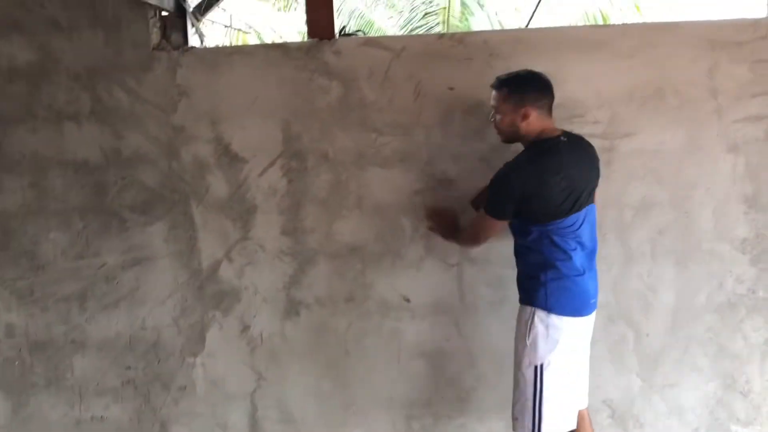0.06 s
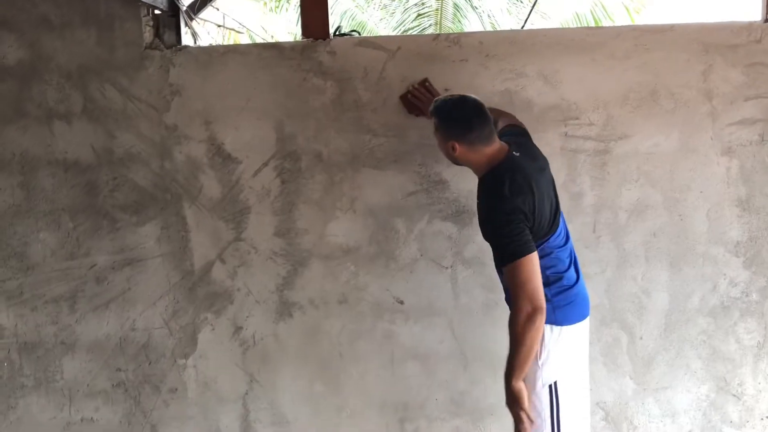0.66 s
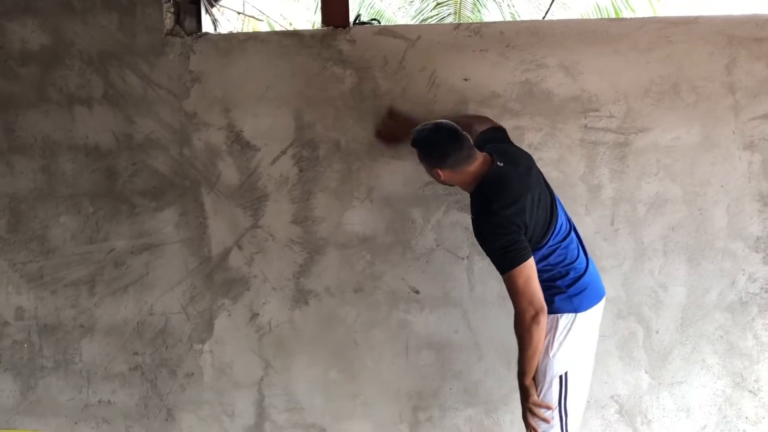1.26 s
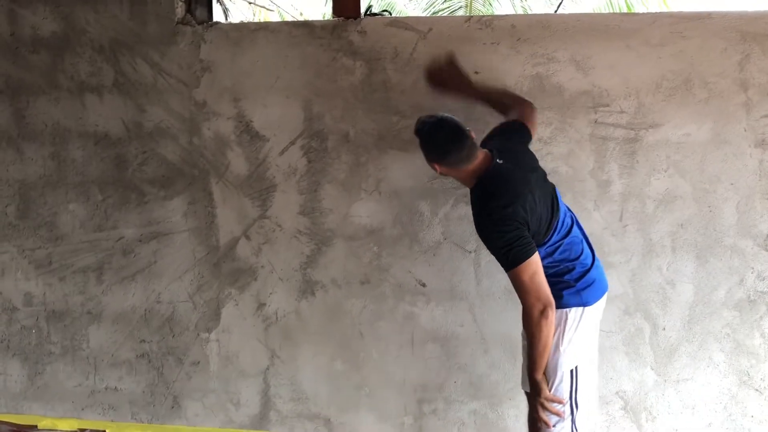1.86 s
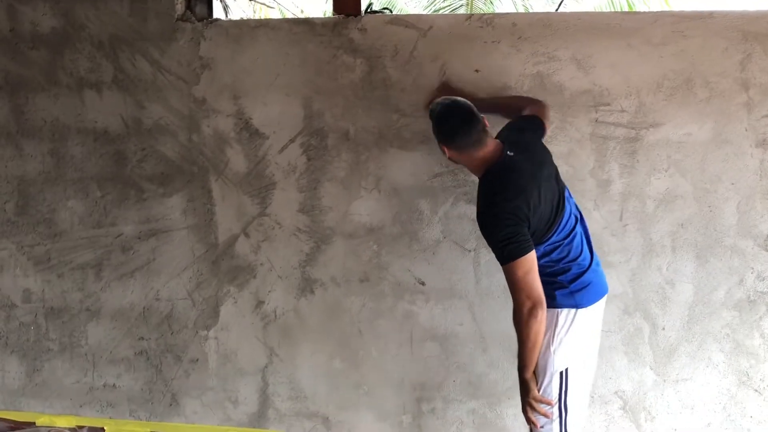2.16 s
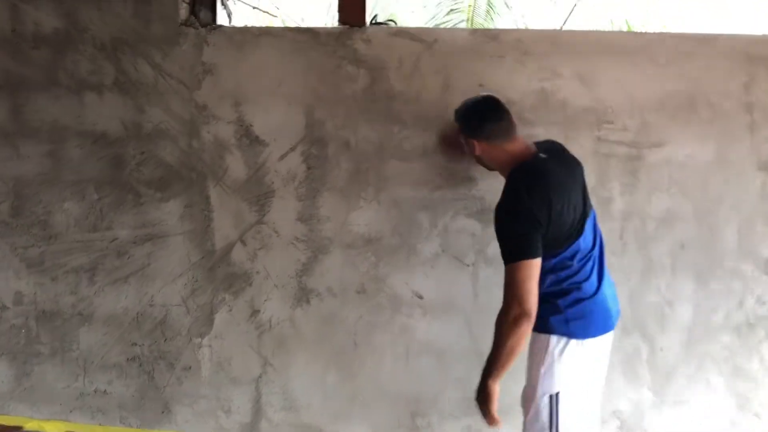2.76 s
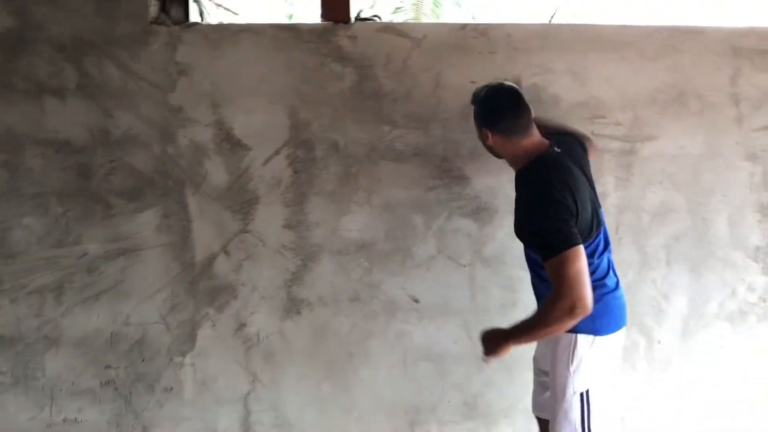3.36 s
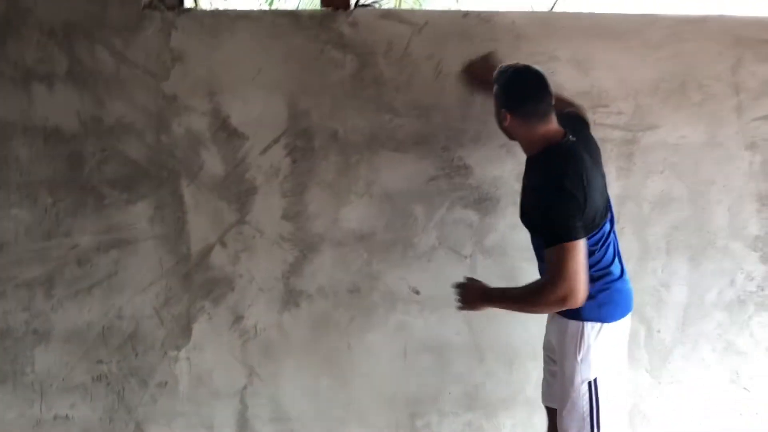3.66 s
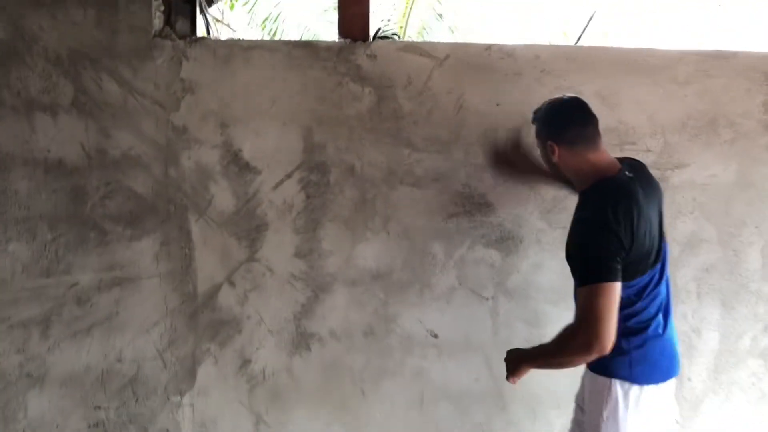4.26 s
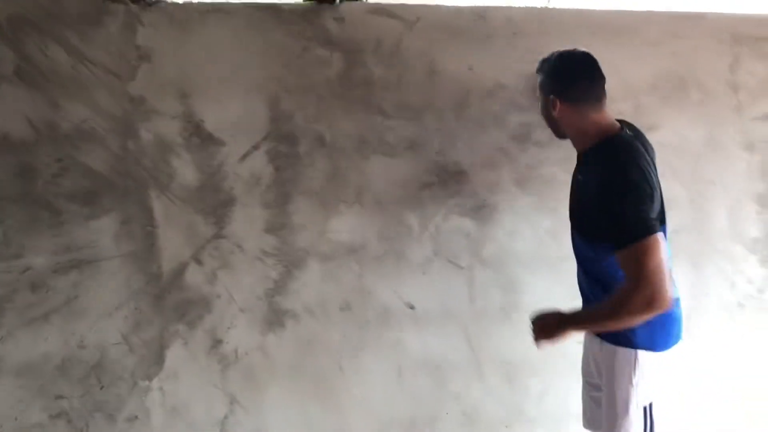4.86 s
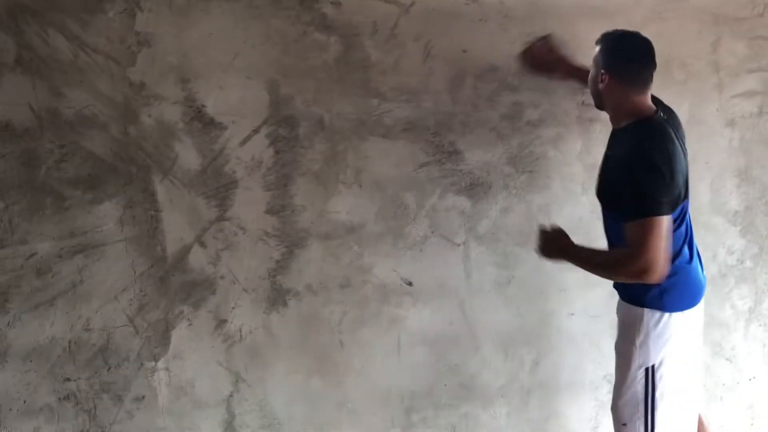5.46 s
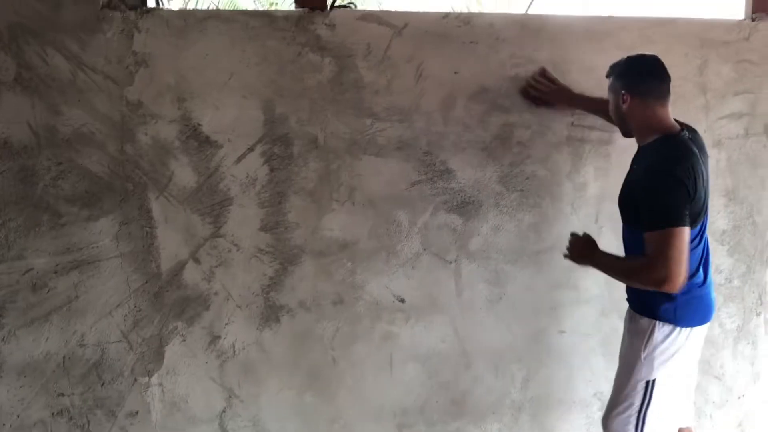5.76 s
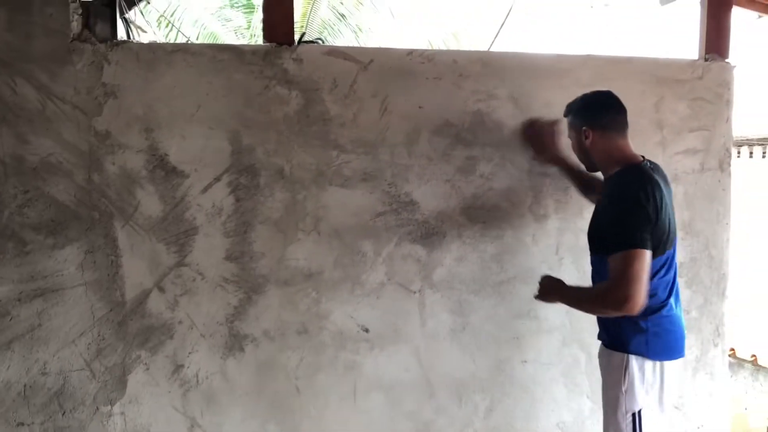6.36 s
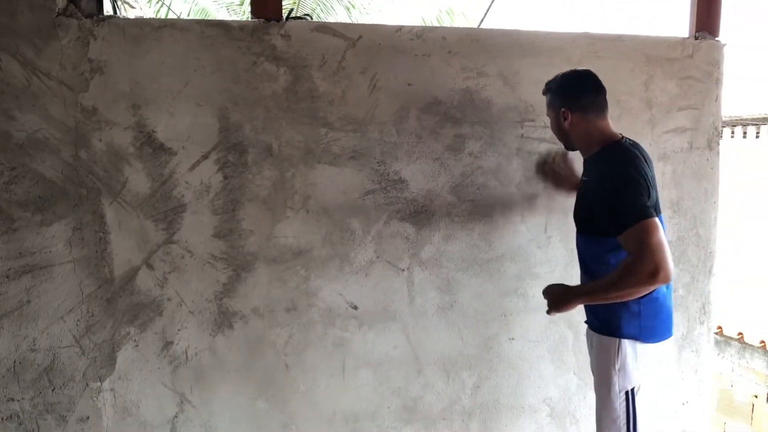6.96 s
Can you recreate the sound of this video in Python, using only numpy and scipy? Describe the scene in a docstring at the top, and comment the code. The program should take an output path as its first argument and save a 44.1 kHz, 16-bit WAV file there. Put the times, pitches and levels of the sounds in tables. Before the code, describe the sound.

Under an open-sided roof, someone sands a rough plaster wall by hand. A few light paper crinkles come first, followed by a continuous, grainy scraping hiss that pulses unevenly with the sweeping strokes. The rubbing dominates at the microphone, with only a slight echo. A few soft bumps of shifting weight, quiet outdoor air, a low hum and a distant motor near the end are barely audible.

```python
"""Under an open-sided roof, a man sands a cement wall by hand in quick sweeping strokes.
The paper crackles as he lifts it to the wall. Then grit catches on the plaster thousands of times
a second and sets the paper under his palm ringing; at each turn the hiss sinks and dulls.
Soft bumps mark his shifts of weight, and the roof and floor add a short tail.
Behind it all are outdoor air, a mains hum and, late on, a far motor."""
import sys
import numpy as np
from scipy import signal
from scipy.fft import rfft, irfft
from scipy.io import wavfile

SR = 44100
rng = np.random.default_rng(int(sys.argv[2]) if len(sys.argv) > 2 else 0)


def digitize_waveform(pressure):
    """Quantize a signal to 16-bit integers and store it at the path in sys.argv[1].

    Rows of a 2-D input are taken as channels; values are limited to [-1, 1].
    """
    field = np.atleast_2d(pressure).T
    bounded = np.clip(field, -1, 1)
    quanta = np.round(bounded * 32767).astype(np.int16)
    wavfile.write(sys.argv[1], SR, quanta)


N = 318843
TIME = np.arange(N) / SR


def from_db(db):
    """Decibels to gain."""
    return 10 ** (np.asarray(db) / 20)


def rms_one(x):
    """Scale to unit rms."""
    return x / np.sqrt(np.mean(x ** 2) + 1e-20)


def in_time(rows):
    """Breakpoints to automation curves, one for each column after the time."""
    times, *columns = np.transpose(rows)
    return [np.interp(TIME, times, column) for column in columns]


def at_hz(points, hz):
    """Read a table along log frequency."""
    f, value = np.transpose(points)
    return np.interp(np.log(np.maximum(hz, 1)), np.log(f), value)


def swells(rows):
    """Sum of bell-shaped swells, from rows of t/s, height, half length/s."""
    return sum(height * np.exp(-((TIME - s) / half_s) ** 2) for s, height, half_s in rows)


def drift(rate_hz):
    """Smooth random modulation of spread 1."""
    hop, settle = 40, 2000
    pole = np.exp(-2 * np.pi * rate_hz * hop / SR)
    noise = rng.standard_normal(N // hop + settle + 2)
    slow = signal.lfilter([1], [1, -2 * pole, pole * pole], noise)[settle:]
    return np.interp(np.arange(N) / hop, np.arange(len(slow)), rms_one(slow))


def waver():
    """A gain that wavers by a couple of decibels, as far tones do on their way."""
    return from_db(2 * drift(rate_hz=4))


def colour(x, eq):
    """Minimum-phase EQ, so nothing rings ahead of a click."""
    size = 8192
    gain = from_db(at_hz(eq, np.fft.rfftfreq(size, 1 / SR)))
    cepstrum = irfft(np.log(gain))
    fold = 1 + np.sign(size / 2 - np.arange(size)) * (np.arange(size) > 0)
    response = irfft(np.exp(rfft(cepstrum * fold)))
    return signal.oaconvolve(x, response)[:N]


def butter(x, hz, kind):
    """Second-order Butterworth filter."""
    return signal.sosfilt(signal.butter(2, hz, kind, fs=SR, output="sos"), x + 1e-18)


def resonate(x, hz, width_hz):
    """One resonance, gain 1 at its peak."""
    r = np.exp(-np.pi * width_hz / SR)
    feedback = [1, -2 * r * np.cos(2 * np.pi * hz / SR), r * r]
    return signal.lfilter(np.array([1, 0, -1]) * (1 - r * r) / 2, feedback, x)


def grit(per_s, spread_db):
    """Grains catch and let go at random: tiny clicks of uneven size, at a steady overall level."""
    sizes = from_db(spread_db * np.clip(rng.standard_normal(N), -2.5, 2.5))
    signs = rng.choice([-1, 1], N)
    catches = rng.random(N) < per_s / SR
    return rms_one(sizes * signs * catches / np.sqrt(per_s))


# EQ of the outdoor bed: f/Hz, level/dB
AIR_EQ = [(20, -7), (38, -23), (55, -13), (80, -2.5), (130, -3), (220, -3.5), (340, -4.5), (500, -10),
          (1000, -16), (2000, -24.5), (5000, -23.5), (9000, -31), (16000, -28)]

def air():
    """Outdoor air: a steady bed of dark noise."""
    return from_db(-50.5) * rms_one(colour(rng.standard_normal(N), AIR_EQ))


# swells and dips of the hum's fundamental: t/s, rise/dB, half length/s
HUM_RIDES = [(.09, 10, .12), (2.62, 9, .18), (3.46, 6, .07), (4.03, 8, .07), (5.4, 9, .1), (5.62, -8, .05),
             (6.17, 5, .1), (6.82, -8, .12)]

def mains_hum(hz=60):
    """The mains tone and its octave, each wavering in level."""
    level_db = -60 + swells(HUM_RIDES) + 2 * drift(rate_hz=4.1)
    phase = 2 * np.pi * hz * TIME + drift(rate_hz=3.1) / 2
    octave = from_db(-62) * waver() * np.sin(2 * phase)
    return np.sqrt(2) * (from_db(level_db) * np.sin(phase) + octave)


# creases giving way: t/s, level/dB, bright edge re level/dB, rustle decay/s
CREASES = [(0.004, -49, -8, .07), (0.1795, -47, -11, .025), (0.190, -48, -9, .025), (0.277, -57, 3, .02),
           (0.341, -55, 10, .016), (0.378, -58, -2, .012), (0.427, -46, -14, .028), (0.518, -41, -3, .03),
           (0.557, -46, 11, .025)]
# EQ of the crackle: f/Hz, level/dB
CREASE_EQ = [(400, -17), (1000, -8), (1700, -1), (2500, -1), (5500, -4), (8000, -13.5), (16000, -17)]

def paper_crackles(snap_s=0.002):
    """A crease gives way with a small snap, then the sheet rustles for a moment."""
    body, edge = np.zeros(N), np.zeros(N)
    for s, level_db, edge_db, rustle_s in CREASES:
        age = np.maximum(TIME - s, 0)
        envelope = from_db(level_db) * (TIME >= s) * (np.exp(-age / rustle_s) + np.exp(-age / snap_s))
        body += envelope
        edge += from_db(edge_db) * envelope
    fibres = rms_one(colour(grit(per_s=11000, spread_db=6), CREASE_EQ))
    return body * fibres + butter(edge * fibres, 7100, "high")


# the paper touches, creeps, slides, then holds near full pace: t/s, speed re full pace/dB
HAND_PACE = [(.5, -42), (.52, -40), (.585, -29), (.61, -7.8), (.84, -7.5), (.89, 0.3), (1.9, 0.56),
             (2.5, 0.4), (2.85, 0.5), (3.2, -0.04), (3.95, 0.15), (4.35, .5), (5.05, 0.5), (5.4, -0.4),
             (5.75, 0.1), (6.25, -0.04), (6.9, 0.55), (7.23, -0.4)]
# how hard the hand bears on the wall: t/s, force re usual/dB
HAND_FORCE = [(.68, -3), (.8, 1), (1.0, -1.5), (1.85, -0.7), (2.02, 3), (2.15, -.5), (2.6, .8), (3.03, 1.2),
              (3.25, 0.3), (3.46, 3), (3.78, 1.7), (4.0, 0.2), (4.35, 0), (5.12, 0.5), (5.26, 3.3),
              (5.9, 3), (6.3, -.5), (7.23, -0.6)]
# turns and bends of the stroke: t/s, speed loss/dB, half length/s, bite in force/dB
HAND_TURNS = [(1.03, 6.5, 0.045, 1.0), (1.171, 3, 0.068, 2), (1.428, 4, 0.069, 1), (1.593, 2, 0.056, 0.5),
              (1.775, 2.5, 0.067, 0.5), (2.002, 2.7, 0.032, 1), (2.194, 1, 0.052, -0.5),
              (2.357, 6.4, 0.034, 1.1), (2.579, 2.5, 0.068, 4), (2.714, 7.8, 0.042, 2),
              (2.938, 1.6, 0.04, 2.5), (3.085, 4.5, 0.053, 0), (3.841, 7, 0.025, 3.2), (4.19, 10, 0.036, 4),
              (4.541, 5.2, 0.047, 2.1), (4.95, 2.5, 0.025, 0.8), (5.072, 2.3, 0.017, -3),
              (5.651, 6.5, 0.042, -1), (5.984, 9.5, 0.034, 2.5), (6.356, 7.5, 0.039, 3.5),
              (6.728, 4, 0.053, 1)]

def hand(bite_after_s=0.054, bite_half_s=0.03):
    """Speed and force in dB: the hand slows into each turn and mostly bites as it sets off again."""
    pace_db, = in_time(HAND_PACE)
    force_db, = in_time(HAND_FORCE)
    slowing_db = swells([(s, loss_db, half_s) for s, loss_db, half_s, _ in HAND_TURNS])
    bite_db = swells([(s + bite_after_s, db, bite_half_s) for s, _, _, db in HAND_TURNS])
    return pace_db - slowing_db, force_db + bite_db


# EQs of the coarse scrape and the fine sizzle: f/Hz, level/dB
COARSE_EQ = [(500, -45), (1000, -14.5), (1500, -12), (1900, -12), (2300, -0.5), (2700, 1), (3500, 1.5),
             (4200, 0), (5000, -2.5), (7000, -4), (9000, -6.5), (12000, -16), (16000, -9)]
FINE_EQ = [(2000, -33), (5000, 4), (7000, 4.5), (8500, 3), (11000, 3.5), (13500, 3), (16000, 0)]

def scrape(speed_db, force_db, density):
    """Coarse and fine grit scrape the plaster: louder and brighter with speed, deeper with force."""
    coarse = rms_one(colour(grit(per_s=22000 * density, spread_db=3), COARSE_EQ))
    fine = rms_one(colour(grit(per_s=24000 * density, spread_db=2.8), FINE_EQ))
    coarse_db = -19 + 0.69 * speed_db + 0.55 * force_db
    fine_db = -19.5 + 1.3 * speed_db - 0.43 * force_db
    return from_db(coarse_db) * coarse + from_db(fine_db) * fine


# resonances of the paper under the palm: f/Hz, width/Hz, level/dB
PAPER_MODES = [(1360, 250, -4.5), (1561, 160, -0.5), (1761, 122, 1), (1987, 210, 0.5)]
# the paper catches and rings out in a hollow rasp: t/s, rise/dB, half length/s
PAPER_RASPS = [(.585, 8, 0.022), (.66, 4.5, 0.049), (.775, 9, 0.055), (.868, 6.5, 0.019), (1.08, 1, 0.018),
               (2.04, 3.5, .03), (2.29, 2.5, .025), (2.51, 2.5, .015), (2.82, 2, 0.019), (3.54, 4.5, 0.011),
               (3.63, 2, .02), (3.71, 4, .025), (4.08, 5, .025), (4.76, 1.5, 0.036), (4.94, 4.5, 0.036),
               (5.55, 5.5, 0.012), (5.71, 6.5, 0.018), (5.9, 3.5, 0.043)]

def paper_ring(speed_db, force_db, density):
    """Catching grains set the paper ringing unevenly, the more so as the hand bears down."""
    level_db = -28.5 + 0.69 * speed_db + 0.87 * force_db
    level_db += swells(PAPER_RASPS) + 0.47 * drift(rate_hz=24)
    ring = np.zeros(N)
    for hz, width_hz, mode_db in PAPER_MODES:
        catches = grit(per_s=5200 * density, spread_db=2.2)
        ring += from_db(mode_db) * rms_one(resonate(catches, hz, width_hz))
    return from_db(level_db) * rms_one(butter(ring, [1150, 2500], "band"))


# EQ of the dull midrange rub: f/Hz, level/dB
RUB_EQ = [(80, -22), (200, -20.5), (400, -8), (520, -4), (680, -1.5), (830, 3.5), (960, 2.5), (1250, 2),
          (2000, -7.5), (4000, -39)]

def palm_rub(speed_db, force_db, density):
    """Coarse catches shake the hand: a dull rub that follows force far more than speed."""
    catches = grit(per_s=3500 * density, spread_db=1.5)
    level_db = -38 + 0.3 * speed_db + 1.52 * force_db
    return from_db(level_db) * rms_one(colour(catches, RUB_EQ))


def flex(x, depth_db, width_hz, lasts_s):
    """The paper buckles and the cupped hand changes shape, so narrow peaks of colour come and go."""
    framing = dict(fs=SR, nperseg=512, noverlap=384)
    hz, s, frames = signal.stft(x, **framing)
    steps = np.arange(-24, 25)
    across_hz = np.exp(-(steps * hz[1] / width_hz) ** 2)
    across_time = np.exp(-(steps * s[1] / lasts_s) ** 2)
    noise = rng.standard_normal(frames.shape)
    peaks = rms_one(signal.fftconvolve(noise, np.outer(across_hz, across_time), "same"))
    return signal.istft(frames * from_db(depth_db * peaks), **framing)[1][:N]


def plaster(lumps_per_s=90, fade_s=0.005):
    """Level flutter in dB: lumps jolt every grain at once, and rough and smooth patches pass by."""
    hits = rng.random(N) * (rng.random(N) < lumps_per_s / SR)
    jolts = signal.lfilter([1], [1, -np.exp(-1 / (fade_s * SR))], hits)
    patches_db = 0.43 * drift(rate_hz=22)
    return 0.5 * rms_one(jolts - jolts.mean()) + patches_db


def sanding():
    """One hand drives scrape, ring and rub as the paper slides over the plaster."""
    speed_db, force_db = hand()
    density = from_db(0.45 * speed_db)  # a faster hand meets more grains per second
    hiss = scrape(speed_db, force_db, density)
    body = paper_ring(speed_db, force_db, density) + palm_rub(speed_db, force_db, density)
    hiss = flex(hiss, depth_db=1.26, width_hz=130, lasts_s=0.021)
    body = flex(body, depth_db=2.6, width_hz=41, lasts_s=0.027)
    contact, = in_time([(0.505, 0.16), (0.525, 1)])  # opens up as the paper meets the wall
    return contact * from_db(plaster()) * (hiss + body)


# soft bumps as he shifts his weight: t/s, level/dB, f/Hz
WEIGHT_SHIFTS = [(1.42, -46, 324), (3.79, -47, 314), (3.85, -44, 218), (4.28, -47, 216)]

def weight_bumps(width_hz=66, half_s=0.033):
    """Shifts of weight make padded thuds that swell and die in about a tenth of a second."""
    out = np.zeros(N)
    for s, level_db, hz in WEIGHT_SHIFTS:
        thud = resonate(resonate(rng.standard_normal(N), hz, width_hz), hz, width_hz)
        out += rms_one(thud) * swells([(s, from_db(level_db), half_s)])
    return out


# the motor's pass: t/s, firing rate/Hz, level/dB
MOTOR_PASS = [(5.5, 71, -80), (6.35, 74, -63), (6.8, 70.7, -54), (7.23, 66, -63)]
# its harmonics: multiple of the firing rate, level/dB
MOTOR_HARMONICS = [(2, -3), (3, 2)]

def far_motor():
    """A motor passes far away: two wavering harmonics of its firing rate swell and recede."""
    firing_hz, level_db = in_time(MOTOR_PASS)
    unsteady_hz = firing_hz * (1 + 0.0064 * drift(rate_hz=9.1))
    phase = 2 * np.pi * np.cumsum(unsteady_hz) / SR
    drone = sum(from_db(level_db + db) * waver() * np.sin(k * phase) for k, db in MOTOR_HARMONICS)
    return np.sqrt(2) * drone


# reverb time of the roofed space: f/Hz, t60/s
SHELTER_DECAY = [(200, 0.39), (1500, 0.53), (5000, 0.14), (15000, 0.38)]

def tail(x, predelay_s=0.004):
    """Floor, roof and posts return a short diffuse tail that dies fastest around 5 kHz."""
    t, response = TIME[:SR // 2], 0
    edges_hz = np.geomspace(120, 17000, 8)
    for low, high in zip(edges_hz, edges_hz[1:]):
        t60 = at_hz(SHELTER_DECAY, np.sqrt(low * high))
        band = butter(rng.standard_normal(len(t)), [low, high], "band")
        response += band * from_db(-60 * t / t60)
    response *= t > predelay_s
    return signal.oaconvolve(x, response / np.linalg.norm(response))[:N]


def shelter(x, wet_db, sweep_hz=1.4):
    """Two tails crossfade: the echo paths change as the hand sweeps to and fro across the wall."""
    sweep = 2 * np.pi * sweep_hz * TIME
    return x + from_db(wet_db) * (tail(x * np.cos(sweep)) + tail(x * np.sin(sweep)))


def scene():
    """The work under the roof, laid over the outdoor bed, alike in both channels."""
    work = shelter(sanding() + paper_crackles() + weight_bumps(), wet_db=-10.5)
    mono = from_db(-0.4) * work + air() + mains_hum() + far_motor()
    return np.array([mono, mono])


def record(dry, ceiling=1.1, cutoff_hz=15850):
    """A soft clip rounds the tallest peaks and a steep low-pass cuts the top."""
    rounded = ceiling * np.tanh(dry / ceiling)
    return signal.sosfilt(signal.ellip(12, 0.1, 85, cutoff_hz, fs=SR, output="sos"), rounded)


dry = scene()
out = record(dry)
digitize_waveform(out)
```